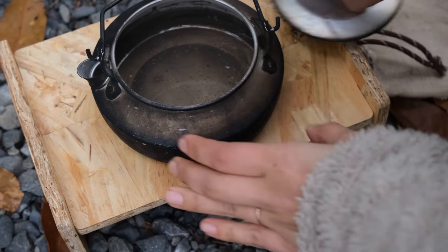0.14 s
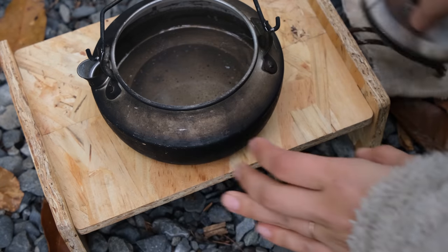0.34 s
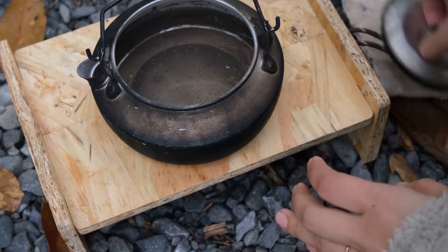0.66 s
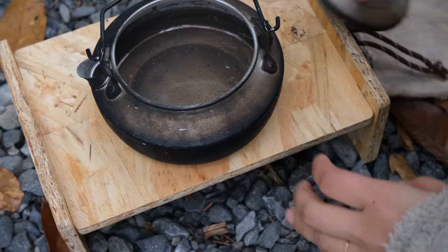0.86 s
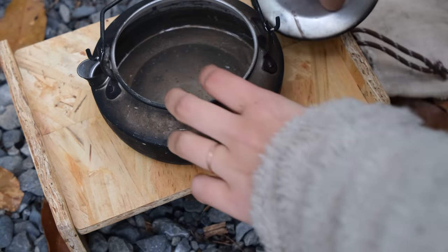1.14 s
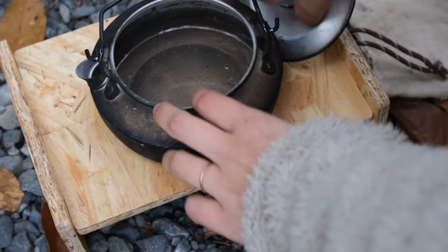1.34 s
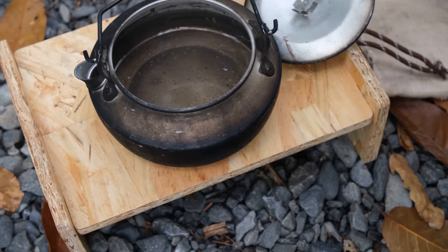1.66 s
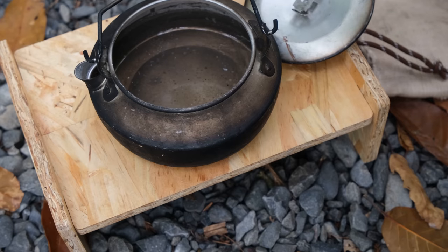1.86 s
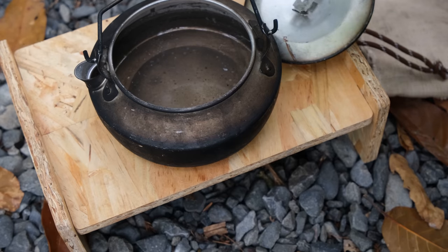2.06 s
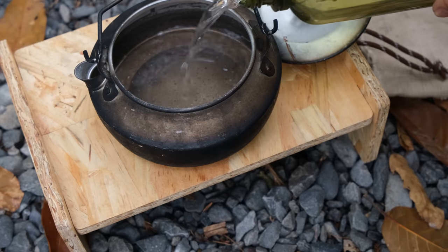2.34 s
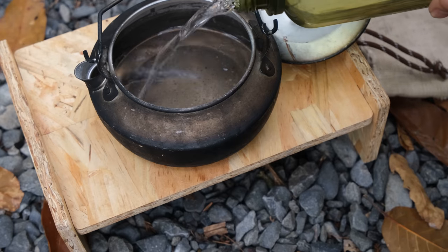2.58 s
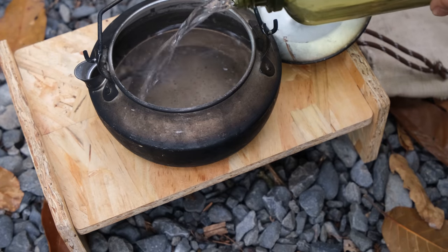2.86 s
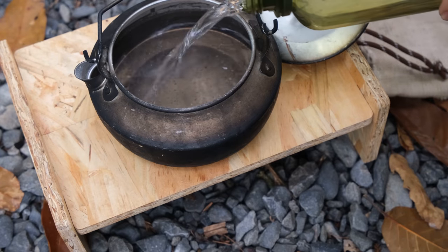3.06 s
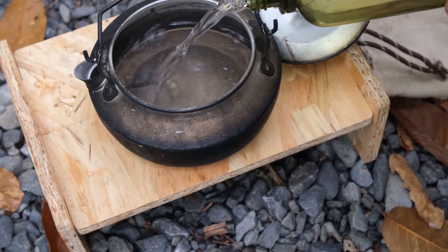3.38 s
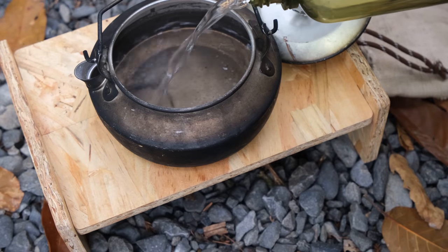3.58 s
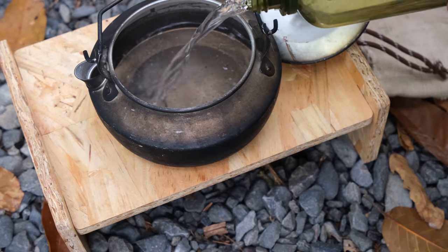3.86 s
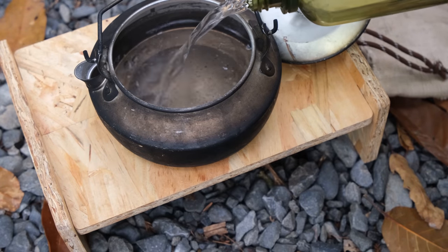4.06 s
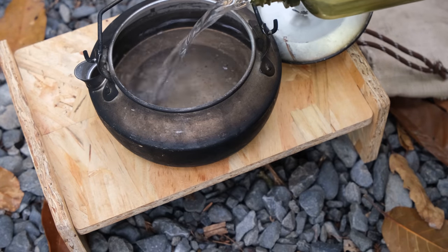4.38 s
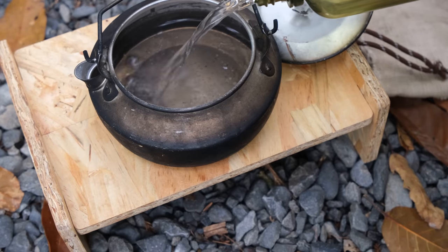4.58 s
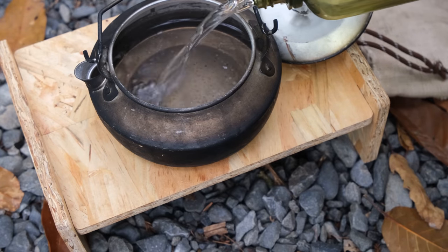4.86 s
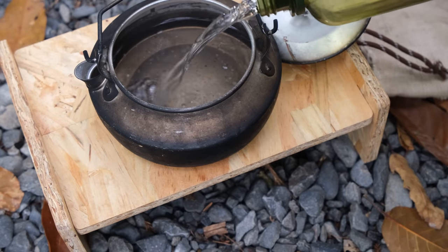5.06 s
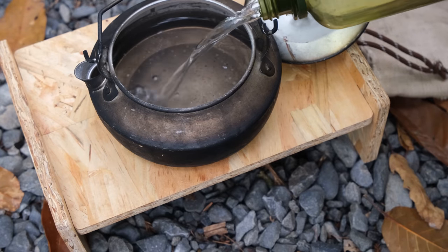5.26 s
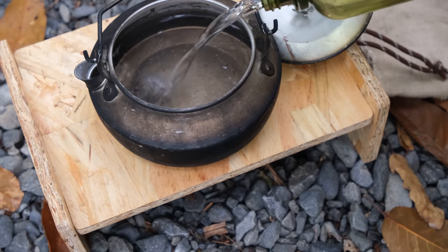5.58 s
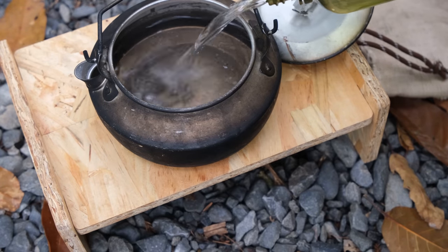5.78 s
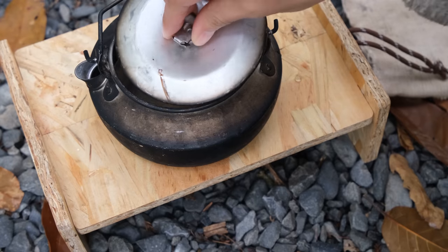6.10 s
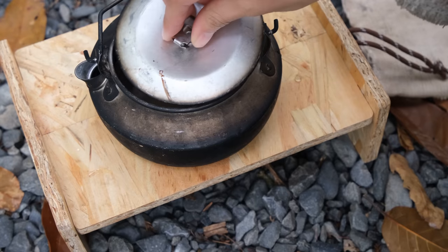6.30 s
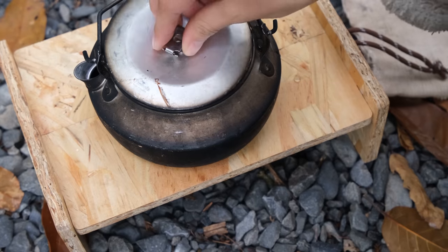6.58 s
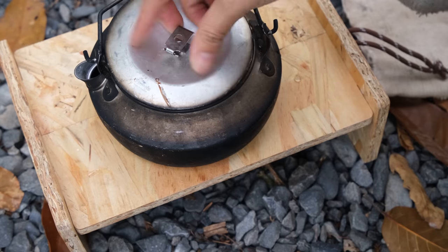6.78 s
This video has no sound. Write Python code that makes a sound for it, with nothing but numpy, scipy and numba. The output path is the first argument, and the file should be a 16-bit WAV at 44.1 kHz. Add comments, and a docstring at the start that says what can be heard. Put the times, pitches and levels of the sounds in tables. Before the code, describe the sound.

Close outdoor sounds of faint metal rattles, a loud lid clank on wood, bright water pouring into a kettle, and the lid clinking shut.

```python
"""Lid, stool and kettle outdoors

A light metal lid is slid and dropped on a plywood stool, water glugs from a bottle into an iron kettle,
and the lid is fitted on the kettle, close to a two-port microphone over a low rumble, hiss and faint hoot.
Metal and wood are modal resonators excited by impact or stick-slip friction; the water is ringing
bubbles and bursts of spray, coloured by the kettle's resonances; the background is shaped noise."""
import sys
import numpy as np
from scipy import signal
from scipy.fft import rfft, irfft
from scipy.io import wavfile
from scipy.ndimage import uniform_filter1d
from numba import njit

SR = 44100
rng = np.random.default_rng(int(sys.argv[2]) if len(sys.argv) > 2 else 0)


def wrap_up_sound(samples):
    """Save the sound to the file named by the first command line argument, as 16-bit audio."""
    columns = np.atleast_2d(samples).T
    # keep every value between -1 and 1, then stretch to whole-number steps
    tamed = np.clip(columns, -1, 1)
    steps = np.round(tamed * 32767).astype(np.int16)
    wavfile.write(sys.argv[1], SR, steps)


N = 306054

# flow of the poured water: time_s, fizz_db (before fluctuation), gurgle_db (reference relative to the fizz)
STREAM = [(2.42, -80.5, -7.5), (2.55, -65.5, -8), (2.7, -61, -11), (2.9, -65, -6.5), (3.3, -67.5, -6.5),
          (3.52, -65, -4.5), (3.63, -53.5, -10.5), (3.8, -52, -13), (4.15, -57.5, -7), (4.42, -50, -3.5),
          (4.6, -51, -4.5), (4.84, -54, -1.5), (4.98, -59, -0.5), (5.23, -61, -1), (5.3, -54.5, -1),
          (5.62, -58.5, 0), (5.8, -53.5, 0), (5.9, -61.5, 0)]
POUR_START_S, POUR_END_S = STREAM[0][0], STREAM[-1][0]


def undb(db):
    """Amplitude ratio from decibels: twenty decibels make a factor of ten."""
    return 10 ** (np.asarray(db) / 20)


def unit(x):
    """Normalization to unit root-mean-square amplitude."""
    return x / np.sqrt(np.mean(x ** 2))


def peak(x):
    """Normalization to unit peak amplitude."""
    return x / np.abs(x).max()


def curve(rows):
    """Linear interpolation of a table's columns at every sample."""
    s, *columns = np.transpose(rows)
    return [np.interp(np.arange(N) / SR, s, c) for c in columns]


def colour(x, points):
    """Spectral shaping: gain in decibels is interpolated over log frequency."""
    hz, db = np.transpose(points)
    f = np.fft.rfftfreq(x.shape[-1], 1 / SR) + 1  # 1 Hz offset avoids log of zero
    gain = undb(np.interp(np.log(f), np.log(hz), db))
    return irfft(rfft(x) * gain, x.shape[-1])


def band(x, lo_hz, hi_hz):
    """Band-pass filtering by a Butterworth response."""
    return signal.sosfilt(signal.butter(2, [lo_hz, hi_hz], "bandpass", fs=SR, output="sos"), x)


def highpass(x, hz, order):
    """High-pass filtering by a Butterworth response."""
    return signal.sosfilt(signal.butter(order, hz, "highpass", fs=SR, output="sos"), x)


def walk(rate):
    """Random fluctuation: normal levels held for 1 / rate seconds, smoothed by a moving average."""
    k = int(SR / rate)
    return uniform_filter1d(np.repeat(rng.standard_normal(N // k + 1), k), k)[:N]


def add(out, s, x, pan_db=0.):
    """Superposition of a short sound on both channels, with a level difference left minus right."""
    i = int(s * SR)
    x = x[:N - i]
    out[:, i:i + len(x)] += x * undb([[pan_db / 2], [-pan_db / 2]])


def mode(x, hz, t60):
    """Damped resonance: a complex pole driven by x, decaying by 60 dB in t60 seconds."""
    p = np.exp(2j * np.pi * hz / SR - np.log(1000) / (t60 * SR))
    return signal.lfilter([1], [1, -p], x).imag


def clear(x, hz, t60):
    """Selective resonance: band-passing first steepens the skirts, so the gaps between modes stay dark."""
    width = 1.08
    return mode(band(x, hz / width, hz * width), hz, t60)


@njit
def grains(out, start, hz, t60, rise, size, sr):
    """Free damped oscillation: decaying sines whose pitch glides by rise octaves a second."""
    for k in range(len(start)):
        n, phase, f, g = int(t60[k] * sr), 0., hz[k], size[k]
        climb, fade = 2 ** (rise[k] / sr), 1000 ** (-1 / max(n, 1))
        for i in range(min(n, len(out) - start[k])):
            phase += 2 * np.pi * min(f, .45 * sr) / sr
            out[start[k] + i] += g * np.sin(phase)
            f, g = f * climb, g * fade
    return out


def struck(modes):
    """Impact excitation weights a mode by its struck level."""
    return [(hz, struck_db, t60) for hz, struck_db, t60, _ in modes]


def rubbed(modes):
    """Friction excitation weights a mode by its rubbed level."""
    return [(hz, rubbed_db, t60) for hz, _, t60, rubbed_db in modes]


def blows(table, modes, crack_db, clatter_s, scatter_db, detune, focus):
    """Impact excitation: a short rattling push drives the modes; harder blows ring brighter."""
    out, t = np.zeros((2, N)), np.arange(SR // 7) / SR
    for s, db, hard, ms, pan in table:
        push = rng.standard_normal(len(t)) * np.exp(-t * 1000 / max(ms, .1))
        push = band(push, 350, 16000)
        # each blow lands elsewhere: mode levels and pitches scatter
        where, shift = rng.standard_normal((2, len(modes))) * [[scatter_db], [detune]]
        ring = np.zeros(len(t))
        for (f, g, d), w, k in zip(modes, where, shift):
            focused_push = mode(push, f, focus * d)
            partial = peak(mode(focused_push, f * (1 + k), d))
            ring += undb(g + w + hard * np.log2(f / 1000)) * partial
        ring = highpass(ring, 400, 4)  # small bodies radiate little below this
        clatter = rng.standard_normal(len(t)) * 1000 ** (-t / clatter_s)
        clatter = band(clatter, 500, np.clip(3500 * 2 ** (hard / 6), 800, 9000))
        clatter_gain = undb(crack_db + 1.2 * min(hard, 0))
        add(out, s, undb(db) * (peak(ring) + clatter_gain * peak(clatter)), pan)
    return out


def strokes(rows, swell, ease, t):
    """Friction envelope: pressure rises, holds and eases, in shares of each stroke; also the tone column."""
    gain, tone = np.zeros(len(t)), np.zeros(len(t))
    for s, length, db, stroke_tone in rows:
        done = (t - s) / length
        gain += undb(db) * np.clip(np.minimum(done / swell, (1 - done) / ease), 0, 1) ** 2
        tone[done >= 0] = stroke_tone
    return gain, tone


def slide(rows, modes, slips, catch_db, pan_db, swell, ease, favour_db=0):
    """Stick-slip friction: uneven tiny catches, coming in bursts, ring the modes."""
    out, t = np.zeros((2, N)), np.arange(rows[0][0], rows[-1][0] + rows[-1][1] + .15, 1 / SR)
    gain, tone = strokes(rows, swell, ease, t)
    slipping = rng.random(len(t)) < slips / SR
    catches = slipping * rng.standard_normal(len(t)) * undb(catch_db * walk(90)[:len(t)])
    catches = band(catches, 490, 11000)
    steady_ring = sum(undb(g) * clear(catches, f, d) for f, g, d in modes)
    force = catches * gain / np.sqrt(np.mean(steady_ring ** 2))

    def tilt_db(f):
        """Spectral weighting: about a favoured pitch in Hz, or by hardness in dB per octave."""
        return -favour_db * np.abs(np.log2(f / tone)) if favour_db else tone * np.log2(f / 2000)

    x = sum(undb(g) * clear(force * undb(tilt_db(f)), f, d) for f, g, d in modes)
    add(out, t[0], x, pan_db)
    return out


def air():
    """Spatial coherence: a wavering distant rumble is alike at both ports, a thin hiss partly differs."""
    # noise spectrum before the rumble band is replaced: frequency_hz, density_db (relative)
    air_spectrum = [(12, -61), (20, -24.5), (102, -8), (151, -10.5), (217, -1), (330, -6), (380, -13.5),
                    (532, -12), (685, -16), (1010, -20), (1130, -19), (1340, -20), (6270, -25.5),
                    (13400, -28), (16300, -27.5)]
    # rumble before its wavering: time_s, level_db
    rumble_levels = [(0, -64.5), (.62, -62), (.93, -67), (1.3, -67.5), (1.55, -61), (2.2, -61),
                     (2.5, -65.5), (4.05, -66.5), (4.6, -63), (6.11, -66), (6.94, -64.5)]
    mid, side = colour(rng.standard_normal((2, N)), air_spectrum)
    scale = undb(-64) / np.sqrt(np.mean(mid ** 2))  # sets the whole mid noise, rumble band included
    low = band(mid, 90, 447.5)
    rumble = unit(low) * undb(curve(rumble_levels)[0] + 2.4 * walk(34))
    side = highpass(side, 1500, 2)  # the ports hear nearly the same below this
    return rumble + scale * (mid - low + side * np.array([[1], [-1]]))


def hoots():
    """Harmonic tone: a soft fundamental with a weak octave, perhaps a far dove."""
    # hoots: start_s, length_s, level_db (peak of the fundamental), pitch_hz
    hoot_notes = [(2.628, 0.092, -66.5, 409), (2.77, 0.15, -64.5, 409), (2.957, 0.087, -62.5, 408.5)]
    out = np.zeros((2, N))
    for s, length, db, hz in hoot_notes:
        t = np.arange(int(length * SR)) / SR
        note = np.sin(2 * np.pi * hz * t) + 0.28 * np.sin(2 * np.pi * 2 * hz * t)
        add(out, s, undb(db) * np.sin(np.pi * t / length) * note)
    return out


def handling():
    """Free decay: each small thump or tick is a single dying ring."""
    # thumps and ticks: start_s, level_db, pitch_hz, t60_s
    small_knocks = [(.04, -54.5, 1400, 0.032), (.043, -56, 640, .04), (.06, -55, 110, .1),
                    (.085, -54, 200, 0.055), (.071, -53, 8400, .012), (.333, -63, 8300, .012),
                    (.517, -62, 700, .025), (.636, -60, 800, .02)]
    s, db, hz, t60 = np.transpose(small_knocks)
    return grains(np.zeros(N), (s * SR).astype(np.int64), hz, t60, 0 * hz, undb(db), float(SR))


def carried_lid():
    """Modal resonance of a lid held by its rattling knob: it rings freely near a favoured pitch."""
    # lid hung by its knob: frequency_hz, level_db (relative), t60_s
    held_modes = [(2300, -7, 0.0564), (2980, -3, 0.05), (4440, -9, 0.09), (5260, -8.5, 0.11),
                  (8050, -7, 0.12)]
    # rattles of the knob: start_s, length_s, level_db (before the pitch weighting), favoured_hz
    rattles = [(.0, .07, -63, 3500), (.09, .085, -65, 3800), (.16, .035, -64, 2600), (.22, .035, -65, 4400),
               (.405, .075, -61, 8000), (.46, .05, -61, 5400), (.55, .075, -61, 6500),
               (.593, .02, -69, 3000), (.62, .07, -66, 5300)]
    # favour_db: loss per octave away from the favoured pitch
    return slide(rattles, held_modes, 5000, 1.2, -.6, swell=0.25, ease=0.27, favour_db=15)


def lid_on_stool():
    """Modal excitation: sliding and dropping ring the lid's modes, and two blows those of the stool."""
    # lid on the stool: frequency_hz, struck_db, t60_s, rubbed_db (levels relative)
    lid_modes = [(610, -18, .03, -10), (658, -12, 0.058, -19), (1500, -14, 0.048, -16), (1680, -6, .03, -8),
                 (1767, 1.5, .033, -6), (1890, -4, .022, -3), (2050, -11, .025, -13),
                 (2210, -6, 0.041, -18), (2340, -9, 0.033, -12), (2790, -12, .03, -22), (2975, 4, 0.03, 2),
                 (3070, -1, .025, -2), (3190, -8, .025, -12), (3900, -28, .035, -28),
                 (4400, -20, .025, -20), (4480, -15, .027, -15), (5050, -30, .03, -30),
                 (5360, -17, .03, -22), (5840, -30.5, .025, -28), (6270, -30, .025, -30),
                 (6490, -34, .06, -35.5), (8300, -21, .015, -31), (10490, -19, .025, -36)]
    # blows: start_s, level_db, hardness_db_per_octave, push_decay_ms, left_minus_right_db
    lid_hits = [(.042, -48.5, 4, 2.5, 2), (1.169, -24, 0, 2, 0), (1.176, -34.5, 4, 2, -9),
                (1.232, -41, -1, 2.5, 0), (1.244, -36, 4, 1.5, 0), (1.254, -34, 6, 0.97, 3),
                (1.27, -32, 5, 1.5, 0), (1.281, -34, 1, 1.2, 2), (1.297, -40, 2, 1.2, 2),
                (1.31, -36, 1, 1.2, 0), (1.3235, -23.5, 0, 0.45, 0), (1.327, -20.5, -3.7, 1.3, 1.4),
                (1.378, -38.5, -0.4, 1.3, 0.2), (1.4286, -21, 2, .7, 0.5), (1.4299, -14.5, 3, 0.69, 0),
                (1.4323, -5, 2, 0.61, -0.5), (1.435, -12, 6, 0.57, -1), (1.4415, -22, 5, 1.4, -1.3)]
    # rubbing: start_s, length_s, level_db (before the hardness tilt), hardness_db_per_octave
    lid_rubs = [(1.18, .05, -47, 0), (1.212, .06, -38.5, 2), (1.255, .066, -39, 1), (1.33, .055, -47, 1),
                (1.38, 0.053, -53, -1)]
    # plywood stool: frequency_hz, level_db (relative), t60_s
    stool_modes = [(870, -3, .016), (1030, 0.5, 0.017), (1300, -6, .012)]
    # blows on the stool: same columns as the lid's blows; decays under 0.1 ms act as 0.1 ms
    stool_hits = [(1.3235, -23, 0.0045, 0.46, -1), (1.327, -30, 0, 0.71, 0)]
    cut_s = 1.461  # the sound of lid and stool is cut off abruptly here
    hit = blows(lid_hits, struck(lid_modes), -29, 0.025, 1.6, .004, focus=.25)
    rub = slide(lid_rubs, rubbed(lid_modes), 6000, 3.0, -1.5, swell=.35, ease=0.23)
    stool = blows(stool_hits, stool_modes, -20, .015, 1.5, .015, focus=.15)
    return (hit + rub + stool) * (np.arange(N) < cut_s * SR)


def knocks_and_kettle_lid():
    """Shared modes: small dull knocks, then the lid knocked and rubbed on the kettle, ring one set."""
    # modes of the kettle with its lid on the rim: frequency_hz, struck_db, t60_s, rubbed_db (levels relative)
    kettle_modes = [(470, -12, .012, -20), (1100, -3, .012, -18), (575, -6.5, 0.042, -12), (653, 0, .03, 4),
                    (757, 5, 0.025, 7), (850.7, 1, .038, 4), (945, -2, .045, -3), (1240, -10, 0.036, -12),
                    (1430, -10, .05, -12), (1725, -1, .06, -13), (1850, -3, 0.038, -12),
                    (2200, -9, 0.023, -11), (2400, -16, 0.044, -18), (2720, -13, .1, -13),
                    (2930, -12, .055, -11), (3090, -19, .07, -14), (3450, -15, .05, -18),
                    (3750, -15, .04, -18), (4130, -24, .1, -30), (4500, -23, .05, -26),
                    (5000, -19, .06, -28), (5380, -28, .08, -28), (5700, -17, .06, -26),
                    (6500, -23, .05, -30), (8500, -15, 0.055, -30)]
    # small knocks before and during the pour, then blows of the lid on the kettle after it:
    # start_s, level_db, hardness_db_per_octave, push_decay_ms, left_minus_right_db
    knocks = [(1.549, -49, -7.5, 0.7, -2.0), (1.767, -41, -12, 0.8, -0.5), (1.782, -45, -12, 0.8, -1.0),
              (1.793, -49, -12, 0.7, -2), (2.151, -52, -11, 0.64, 1.0), (2.196, -54, -6, 0.85, -0.5),
              (2.22, -53, -6, 0.62, -1), (3.339, -55, 2, 0.61, 3), (6.208, -26, 0, 0.52, 1),
              (6.214, -36, 4, 0.92, -2), (6.342, -48, 3, .8, 1), (6.357, -54, 8, .8, 1),
              (6.4845, -27.5, -.5, .8, 2), (6.532, -40, -3, .8, 2), (6.5825, -20, 0, 0.3, 2),
              (6.598, -40, 6, .8, 2), (6.887, -47, -7, 0.7, 3), (6.91, -44, -15, 0.79, 2.0),
              (6.935, -26, -3.5, 0.68, 1.5)]
    # rubbing on the rim: start_s, length_s, level_db (before the tilt), hardness_db_per_octave
    rim_rubs = [(6.3, .03, -48, -5), (6.322, .033, -44, -4), (6.445, .04, -63, -4), (6.468, .02, -58, 4),
                (6.495, .03, -54, -2), (6.512, .036, -45, -3), (6.55, 0.02, -60, -2), (6.7, .06, -62, 4),
                (6.76, 0.085, -63, 3)]
    hit = blows(knocks, struck(kettle_modes), -10, 0.035, 2.5, 0.0126, focus=.05)
    rub = slide(rim_rubs, rubbed(kettle_modes), 6000, 1.5, 0.94, swell=0.4, ease=0.4)
    return hit + rub


def swarm(rate, lo_hz, hi_hz, cycles, spread_db, rise):
    """Random superposition: many small bubbles ring at chance moments; a few are much larger."""
    at, pitch, big = rng.random((int(N * rate / SR), 3)).T
    hz = lo_hz * (hi_hz / lo_hz) ** pitch
    size = undb(np.minimum(-spread_db * np.log(1 - big), 3 * spread_db))
    start = (at * N).astype(np.int64)
    return grains(np.zeros(N), start, hz, cycles / hz, rise * hz / 1000, size, float(SR))


def chance_events(level_db, spread_db, lo_hz, hi_hz, count):
    """Random events whose strength follows the flow: (s, level dB, Hz, a spare chance 0-1)."""
    at, size, pitch, spare = rng.random((count, 4)).T
    at = POUR_START_S + at * (POUR_END_S - POUR_START_S)
    db = level_db[(at * SR).astype(int)] - spread_db * size
    return at, db, lo_hz * (hi_hz / lo_hz) ** pitch, spare


def slaps(fizz_db, count=6):
    """Resonant excitation: each burst of spray shakes one main bubble and a scatter of others."""
    # slaps at set times, loud and faint: start_s, level_db (before the mix of ring and spray), ring_hz
    set_slaps = [(2.2587, -31, 7150), (2.4383, -43, 10700), (2.4498, -42.5, 7750), (2.4922, -40, 9100),
                 (2.5082, -38.5, 4170), (2.5303, -41, 3860), (2.552, -28, 7260), (2.6653, -28, 5540),
                 (2.6962, -35, 6300), (2.789, -39.5, 7470), (2.807, -38.5, 7130), (2.835, -35, 10640),
                 (2.9217, -44.5, 8000), (3.0455, -42, 4600), (3.1641, -43.5, 10600), (2.957, -36, 9950),
                 (3.063, -34, 6150), (3.2343, -28, 7600), (3.3226, -43.5, 3640), (3.446, -39.5, 3790),
                 (3.5375, -36, 9000), (3.5682, -37, 6300), (3.606, -26, 10520), (3.6213, -29.5, 6020),
                 (3.6431, -24, 8950), (3.6625, -28.5, 7540), (3.7014, -26.5, 7030), (3.7113, -29.5, 3490),
                 (3.733, -37, 2790), (3.746, -33, 8500), (3.786, -34, 9300), (3.7635, -25, 7160),
                 (3.8011, -38, 3320), (3.82, -30, 9400), (3.873, -35, 6900), (4.381, -35, 4630),
                 (4.495, -35, 6000), (3.838, -26, 7000), (3.8568, -32, 4020), (3.9119, -32.5, 9300),
                 (4.004, -26, 8650), (4.0167, -30.5, 6880), (4.069, -36.5, 7000), (4.105, -30.5, 7800),
                 (4.121, -31, 7200), (4.1776, -31.5, 4260), (4.2004, -24, 7000), (4.293, -33, 5760),
                 (4.3024, -32, 5980), (4.3257, -34.5, 5330), (4.3694, -33, 5500), (4.3958, -27.5, 5800),
                 (4.4368, -28, 5530), (4.5006, -27, 5540), (4.543, -23, 5780), (4.572, -33, 8060),
                 (4.626, -25, 6300), (4.638, -29, 5750), (4.658, -32, 5400), (4.671, -32, 6500),
                 (4.712, -36, 7900), (4.809, -33, 7500), (4.859, -35, 9000), (4.871, -35, 6500),
                 (4.884, -37, 4400), (4.7386, -31, 3650), (4.768, -32.5, 5490), (4.794, -34.5, 7000),
                 (4.8366, -31, 3210), (4.9815, -35, 9380), (5.007, -36, 3950), (5.024, -36.5, 5340),
                 (5.053, -37, 4430), (5.1327, -36, 5460), (5.253, -33, 9700), (5.285, -37, 5500),
                 (5.3, -37, 5500), (5.349, -33, 4300), (5.391, -35, 6500), (5.534, -35, 7500),
                 (5.322, -36.5, 4280), (5.366, -29, 6120), (5.4, -26, 5270), (5.5165, -37.5, 3200),
                 (5.5422, -36.5, 5500), (5.563, -35, 2980), (5.636, -35.5, 4480), (5.718, -30.5, 5150),
                 (5.7587, -36, 9100), (5.7773, -24, 7900), (5.847, -30.5, 7800), (5.8973, -35.5, 3600)]
    out, t = np.zeros((2, N)), np.arange(SR // 12) / SR
    s, db, hz, _ = chance_events(fizz_db + 16, 12, 2800, 11040, count=200)
    sag_oct_per_s = .15  # chance slaps ring deeper as the kettle fills
    chance_slaps = np.transpose([s, db, hz * 2 ** (-sag_oct_per_s * (s - POUR_START_S))])
    for s, db, hz in np.vstack([set_slaps, chance_slaps]):
        t60 = max(.023 + .0004 * (db + 35), .012)  # seconds; stronger slaps spray longer
        spray = rng.standard_normal(len(t)) * 1000 ** (-t / t60) * np.minimum(t / 0.0001, 1)
        spray = band(spray, hz / 1.15, min(hz * 3.0, 15000))
        others_hz = np.clip(hz * 2 ** (0.51 * rng.standard_normal(count)), 2500, 14000)
        main = mode(spray, hz, .8 * t60)
        others = sum(mode(spray, f, .45 * t60) for f in others_hz)
        ring = main + 0.35 * others
        pan_db = 2 * rng.standard_normal()
        add(out, s, undb(db) * (0.68 * peak(ring) + 0.5 * peak(spray)), pan_db)
    return out


def bubbles(gurgle_db):
    """Bubble resonance: bubbles ring at set and chance times; many chance ones take the hollow's notes."""
    # bubbles at set times, loud and faint: start_s, level_db (before the bowl), pitch_hz, rise_octaves_per_s
    set_bubbles = [(2.44, -61.5, 670, 4), (2.472, -60, 830, 8), (2.54, -53, 2600, -2),
                   (2.542, -60, 1840, 3), (2.622, -55, 2430, 2), (2.642, -61, 1830, 8),
                   (2.686, -59, 1820, 5), (2.737, -59, 2420, 6), (2.884, -57, 1830, 4),
                   (3.064, -58, 1900, 2), (3.09, -61, 670, 2), (3.165, -62.5, 760, 4),
                   (3.186, -60.5, 640, 3), (3.196, -58, 2880, 2), (3.245, -62, 700, 4), (3.35, -57, 673, 2),
                   (3.422, -59, 1950, 10), (3.44, -56, 990, 4), (2.624, -49.5, 1545, 4),
                   (2.777, -50, 1380, 22), (2.79, -53.5, 1850, 8), (2.871, -59, 1550, 10),
                   (3.051, -56.5, 1590, 31), (2.922, -55, 1690, 12), (3.323, -52, 2230, 7),
                   (3.423, -56, 940, 7), (3.51, -41.5, 1396, 36), (3.519, -41, 1820, 40),
                   (3.662, -52.5, 1000, 10), (3.701, -45, 1540, 12), (3.714, -44, 2600, 29),
                   (3.734, -47, 1870, -2), (3.747, -48, 1500, 14), (3.764, -50, 1370, 35),
                   (3.79, -49, 1650, -5), (3.874, -51.5, 1100, 14), (3.944, -48, 1850, 0),
                   (3.961, -45, 2060, 36), (4.119, -52, 1834, -2), (4.24, -50, 1790, 5),
                   (4.278, -45.5, 1900, 27), (4.302, -47, 1815, 3), (4.336, -41, 1060, 10),
                   (4.339, -48, 850, 27), (4.862, -47, 850, 10), (5.391, -54, 743, 0),
                   (5.394, -48, 1530, -5), (5.562, -45, 2150, 0), (4.371, -48, 1090, 15),
                   (4.451, -50, 975, 12), (4.483, -44, 2030, 0), (4.5, -43, 1900, 4), (4.581, -40, 1910, 0),
                   (4.607, -44, 2120, 8), (4.638, -44, 1840, 5), (4.677, -36, 1250, 8),
                   (4.778, -44, 2070, -4), (4.832, -43.5, 1960, 6), (4.861, -47, 1220, 39),
                   (4.998, -48, 1650, 43), (5.08, -50.5, 1830, 9), (5.333, -48, 1820, 28),
                   (5.399, -43.5, 1230, 3), (5.515, -52, 1310, 0), (5.532, -49.5, 790, 27),
                   (5.564, -40, 1487, 3), (5.566, -44.5, 870, 1), (5.736, -40, 2090, 18),
                   (5.783, -45, 2650, 38), (5.797, -45.5, 826, -0.5), (5.8, -43, 1830, 1)]
    # notes of the kettle's hollow: pitch_hz (centre of a small random scatter)
    hollow_notes = (816, 1862, 1857)
    s, db, hz, spare = chance_events(gurgle_db + 7, 8, 782, 2900, count=240)
    note = rng.choice(hollow_notes, len(s)) * (1 + 0.035 * rng.standard_normal(len(s)))
    sings = spare < .5  # share of chance bubbles on the hollow's notes
    rise = np.where(sings, 2, 20 * spare)  # octaves a second
    chance_bubbles = np.transpose([s, db, np.where(sings, note, hz), rise])
    s, db, hz, rise = np.transpose(np.vstack([set_bubbles, chance_bubbles]))
    t60 = 0.038 * (hz / 1500) ** -.3  # seconds; deeper bubbles ring longer
    return grains(np.zeros(N), (s * SR).astype(np.int64), hz, t60, rise, undb(db), float(SR))


def stream():
    """Source and resonator: fizz and gurgle follow the flow, and all of the water rings the bowl."""
    # kettle wall and air: frequency_hz, width_hz, level_db (relative)
    bowl_modes = [(801, 43, 12.5), (1641, 17, -15.5), (1875, 33, 11.5), (2870, 16, 15), (3220, 15, 8.5),
                  (3470, 40, 6.5), (4560, 110, 6), (5500, 45, 6), (5800, 33, -4), (6600, 82, -15.5),
                  (8270, 38, 10.5)]
    # fizz spectrum: frequency_hz, density_db (relative)
    fizz_spectrum = [(1290, -20), (2200, -18.5), (4900, -5), (5630, 0), (6210, -7), (7080, 2.5), (10200, 1),
                     (11800, -9), (15500, -15)]
    fizz_db, gurgle_db = curve(STREAM)
    t = np.arange(N) / SR
    pouring = (t > POUR_START_S) & (t < POUR_END_S)

    # droplets: a shared part, and a part that reaches each port by its own path
    shared, left, right = (unit(swarm(1000, 2390, 13020, 100.0, 4.2, 1.2)) for _ in range(3))
    droplets = shared + undb(-2) * np.array([left, right])
    # even rush under the droplets: a shared part and one that each port has alone
    rush = rng.standard_normal(N) + rng.standard_normal((2, N))
    fizz = unit(colour(droplets + undb(-8) * rush, fizz_spectrum))
    fizz = fizz * undb(fizz_db + 3.9 * walk(60) + 1.6 * walk(12))

    slosh = undb(-3) * unit(band(rng.standard_normal(N), 700, 4500))  # churning water
    gurgle = unit(swarm(1500, 900, 3610, 30.0, 2.5, 7.5)) + slosh
    gurgle = gurgle * undb(fizz_db + gurgle_db - 8.5 + 3.0 * walk(24))

    water = (fizz + gurgle) * pouring + bubbles(fizz_db + gurgle_db) + slaps(fizz_db)
    bowl = np.zeros((2, N))
    for f, width, db in bowl_modes:
        resonance = mode(water, f, np.log(1000) / (np.pi * width))
        bowl += undb(db) * 2 * np.pi * width / SR * resonance
    # few droplets are small enough to ring above 13.5 kHz
    low_pass = signal.butter(4, 13500, fs=SR, output="sos")
    heard = signal.sosfilt(low_pass, undb(0.5) * water + undb(-8.5) * bowl)
    return heard * (t < POUR_END_S)


def scene():
    """Superposition of near and far sources, with an arrival-time difference for the near ones."""
    left, right = carried_lid() + handling() + lid_on_stool() + knocks_and_kettle_lid() + stream()
    # everything near reaches the left port first, by two samples
    near = np.array([left, np.roll(right, 2)])
    return near + air() + hoots()


def record(dry):
    """Band limitation: a steep elliptic low-pass cuts the top above 16 kHz."""
    return signal.sosfilt(signal.ellip(10, .2, 80, 16000, fs=SR, output="sos"), dry)


dry = scene()
out = record(dry)
wrap_up_sound(out)
```